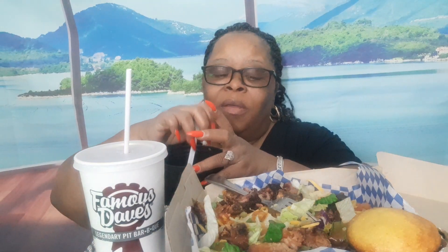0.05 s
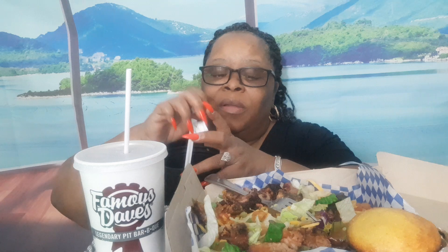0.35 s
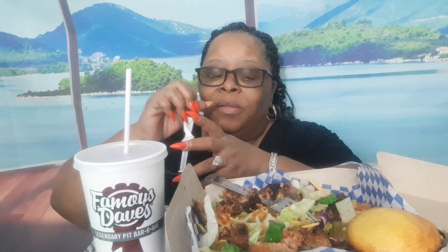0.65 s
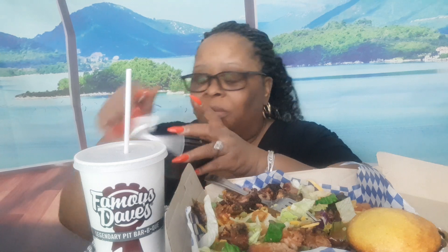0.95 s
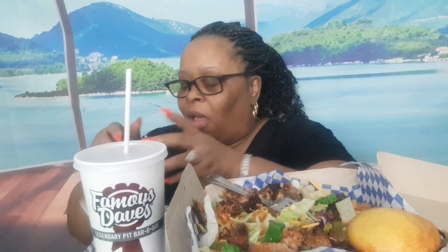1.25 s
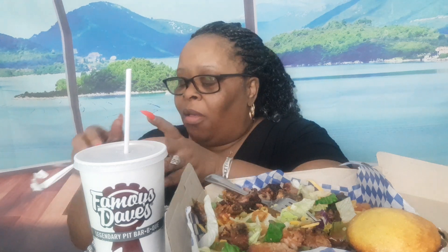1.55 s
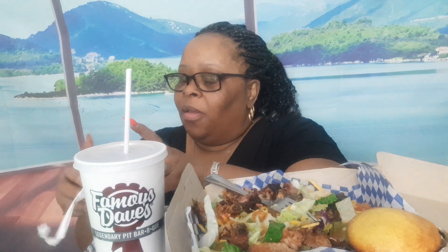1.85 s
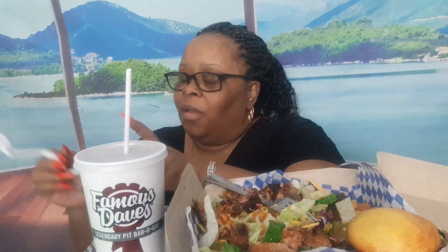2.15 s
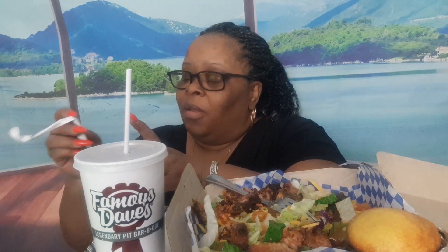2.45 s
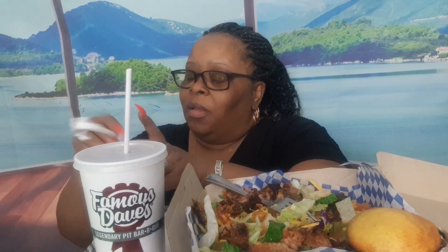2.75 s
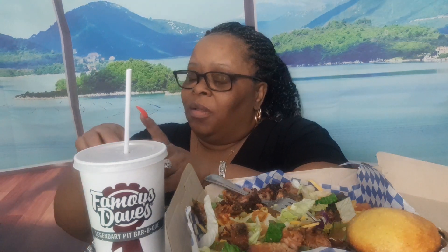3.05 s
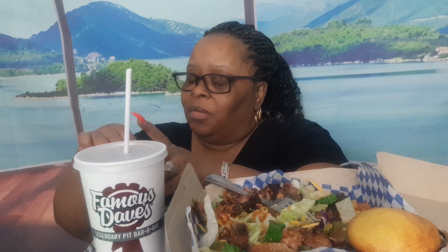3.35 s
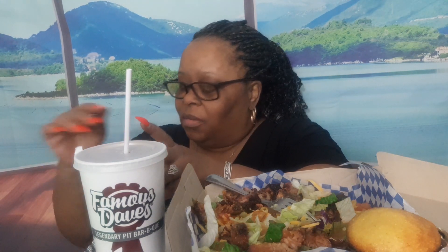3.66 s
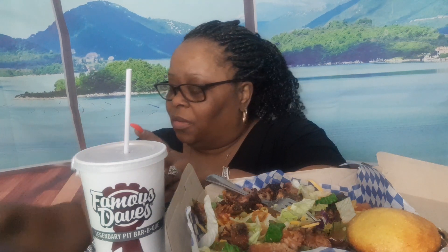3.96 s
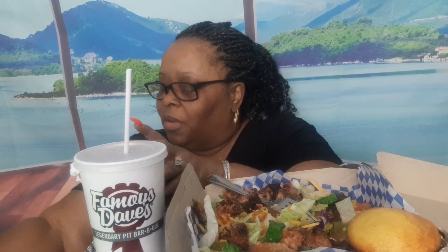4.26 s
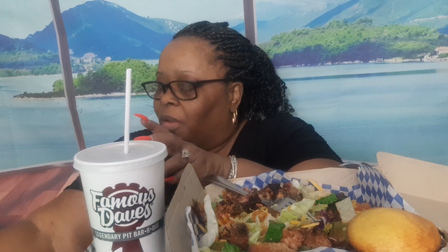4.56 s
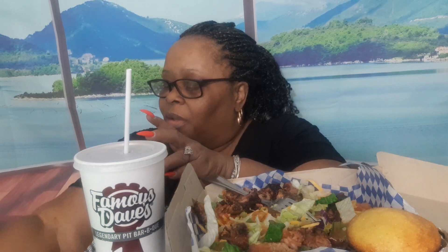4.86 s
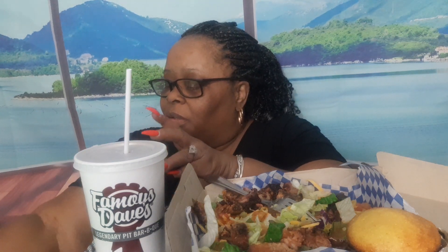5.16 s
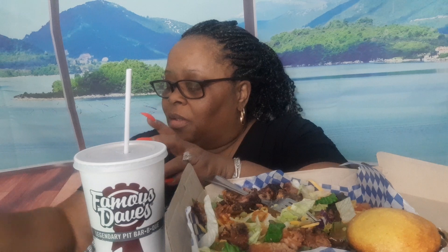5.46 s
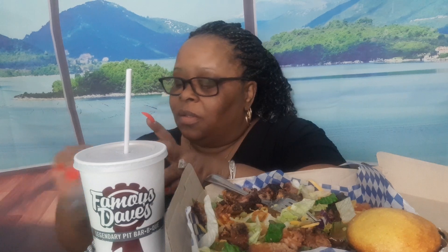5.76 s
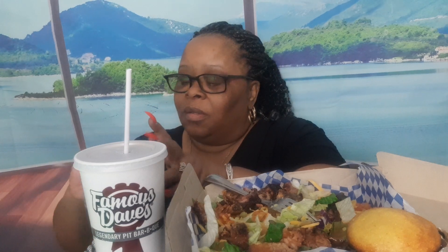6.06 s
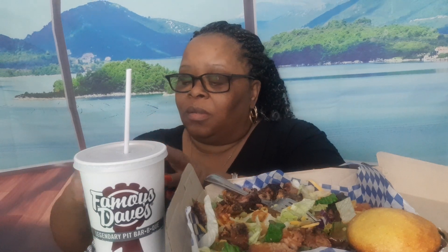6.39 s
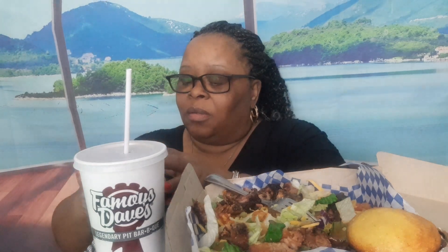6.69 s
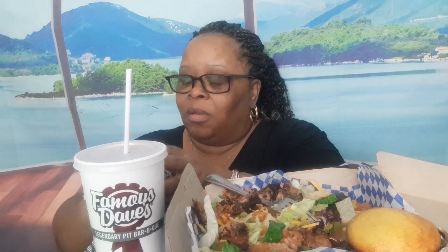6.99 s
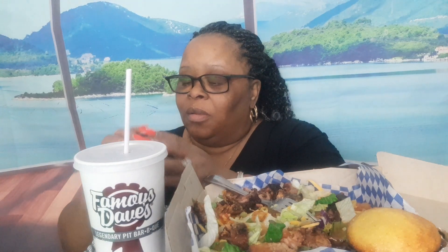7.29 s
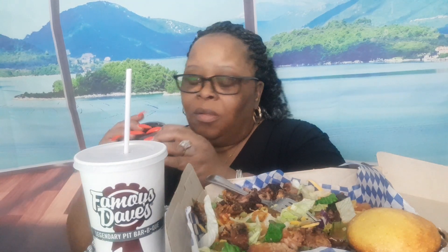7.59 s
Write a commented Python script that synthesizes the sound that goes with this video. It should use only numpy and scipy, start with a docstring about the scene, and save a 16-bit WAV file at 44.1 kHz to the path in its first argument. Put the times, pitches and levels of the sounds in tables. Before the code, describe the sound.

Someone handles takeout things at a table close to the microphone. Light crackles and crisp snaps from a paper wrapper come first, followed by a short run of plastic fork clicks and a tap on a lidded cup. A paper-lined food box scrapes and rocks across the table, lands with a hollow knock and gets one last push. An appliance hums quietly throughout, and the small room adds a short echo.

```python
"""Someone fiddles with takeout things at a table in a small, echoing room; an appliance hums throughout.
First a paper wrapper crinkles and snaps, a forearm rubs the table and a lidded tub is tapped twice.
From 4.3 s a box scrapes along, its paper liner crackling, and a plastic fork ticks on a thin tray.
Near 6 s the tub is tapped again and the box is dragged, rocking on its base. Just before 7 s the box
is set down with a hollow clatter, and one last push ends the scene."""
import sys
import numpy as np
from scipy import signal
from scipy.fft import rfft, irfft
from scipy.io import wavfile
from scipy.ndimage import uniform_filter1d

SR = 44100
rng = np.random.default_rng(int(sys.argv[2]) if len(sys.argv) > 2 else 0)


def output_pcm(signal):
    """Save a mono or channel-first signal as 16-bit PCM at the path in sys.argv[1].

    Samples are clipped to [-1, 1] before scaling.
    """
    pcm = np.clip(np.atleast_2d(signal).T, -1, 1) * 32767
    wavfile.write(sys.argv[1], SR, np.round(pcm).astype(np.int16))


N = 340977
T = np.arange(N) / SR

# Levels compare the rows of a table; the functions set the final loudness.
# low fan noise and faint hiss: pitch_hz, level_db
AIR_SPECTRUM = [(15, -42), (25, -0.5), (45, -18.5), (66, -6.5), (80, -18.5), (114, 3), (145, -3.5),
                (190, -4.5), (309, -9.5), (430, -12.5), (607, -23), (1300, -36), (5000, -38.5),
                (7700, -37.5), (16000, -47)]
# the appliance's tones: pitch_hz, level_db, waver_db
HUM_TONES = [(57, -69, .7), (109, -68.5, 2.5), (141, -72, 2.5), (200.5, -71, 2.5), (276, -76, 2.5),
             (410.2, -65.5, .9)]
# fingers crumpling the wrapper: start_s, length_s, level_db, brightness_db_per_octave
WRAPPER_GRIPS = [(0.0, 0.0032, -52, 3), (.18, 0.15, -59.5, 5), (.3, 0.6, -74, 3.5), (.88, 0.31, -61.5, 1),
                 (1.13, 0.1, -69.5, 2.5), (1.22, 0.17, -54, -0.5), (1.33, 0.22, -65, -6),
                 (1.58, 0.47, -59, 0.5), (1.935, 0.064, -48.5, 0), (2.04, 0.17, -61.5, -1),
                 (2.2, 0.43, -58, 8), (2.72, .13, -47.5, 7.5), (2.9, 0.14, -53, 5),
                 (3.12, 0.081, -50.5, 7.5), (3.24, 0.25, -64, 4.5), (4.31, 0.12, -66, 3.5),
                 (4.56, 0.21, -58, -8.5), (4.87, 0.079, -60, -0.5), (7.565, 0.097, -60, 5.5)]
# the rustle of paper: pitch_hz, level_db
PAPER_SPECTRUM = [(700, -30.5), (1400, -13.5), (2200, -7.5), (3300, -4.5), (6800, -3), (9000, -11.5),
                  (12000, -9.5), (16000, -20)]
# a forearm rubbing the table: start_s, length_s, level_db, squeak_hz
ARM_RUBS = [(0.0, 0.64, -77.5, 890), (.94, 0.27, -71.5, 530), (1.945, 0.02, -49.5, 480),
            (2.09, 0.078, -66, 1150), (2.77, 0.47, -74.5, 758), (3.35, .11, -74.5, 1144)]
# the notes of the rubbed table top: pitch_hz, width_hz, level_db
TABLE_NOTES = [(480, 380, 3), (1140, 300, 4), (1940, 630, 0.5)]
# creases and nails snapping on the wrapper: start_s, level_db, contact_s, ring_hz, ring_db
WRAPPER_SNAPS = [(0.1014, -24.5, 0.0013, 4480, 3), (1.0187, -33, 0.0078, 4350, -5),
                 (1.0827, -34.5, 0.021, 4600, -2), (1.2772, -27.5, 0.0024, 6800, -4),
                 (1.328, -31, 0.0067, 6230, 3), (1.352, -29.5, 0.0021, 5800, -3),
                 (1.761, -36.5, .002, 6300, 4), (1.9987, -27, 0.0017, 6500, 7),
                 (2.1348, -35.5, 0.0024, 5960, 9), (2.1685, -36, 0.0011, 8000, 6),
                 (2.1906, -24.5, .0008, 7500, 19), (2.3198, -34.5, 0.0017, 6500, 4),
                 (2.408, -37, .001, 7050, 4), (2.4198, -30.5, 0.0016, 6200, 11),
                 (2.453, -26, 0.0017, 9400, -3), (2.6385, -32.5, 0.0023, 5960, -1),
                 (2.7118, -28, 0.0021, 9000, 8), (2.7655, -29, .001, 8100, -8),
                 (2.802, -28.5, 0.00086, 6900, -6), (2.8685, -31, 0.00079, 11200, -7),
                 (2.9597, -40, 0.00089, 7460, -9), (2.992, -27, 0.0039, 5400, 4),
                 (3.083, -33.5, 0.008, 6900, -4), (3.1423, -34, .004, 6000, 6),
                 (3.201, -42, 0.0036, 10600, -4), (3.4567, -31.5, .0012, 7000, -11),
                 (3.5147, -38, 0.0014, 6940, -3)]
# the snap of a crease: pitch_hz, level_db
SNAP_SPECTRUM = [(150, -41), (2100, -44), (3000, -6), (4800, -3.5), (7500, -5.5), (11000, -7), (16000, -11)]
# taps on a lidded tub: start_s, level_db, contact_s, body_db, wall_db
TUB_TAPS = [(1.4872, -41, 0.0046, -16.5, -8), (1.956, -47.5, 0.013, -4, 4),
            (5.7756, -25.5, 0.0021, -4.5, -4.5), (5.8666, -55, 0.0018, 5, 12.5),
            (6.0555, -45.5, 0.0019, -12, -3.5), (6.2095, -44.5, 0.0024, -4, -5),
            (6.2235, -44.5, 0.0021, -9, -1.5)]
# the notes of the tub's air space and lid: pitch_hz, width_hz, level_db
TUB_NOTES = [(433, 15, 12.5), (755, 83, -4), (1150, 78, 9), (1310, 190, 1.5), (1580, 570, -6.5)]
# the clack of the tub's rim: pitch_hz, level_db
RIM_SPECTRUM = [(800, -15), (2300, 1.5), (3200, -0.5), (3900, 5), (5200, -6.5), (6800, -2), (9000, -12.5),
                (16000, -19.5)]
# a box pushed over the table: start_s, length_s, level_db, squeak_hz, liner_db
BOX_PUSHES = [(4.332, 0.089, -63, 800, -74), (4.492, 0.063, -56, 490, -65.5), (4.69, 0.29, -64.5, 810, -73),
              (5.835, 0.26, -60, 1000, -62.5), (6.159, 0.068, -50, 940, -60.5),
              (6.251, 0.1, -60, 1040, -62.5), (6.376, 0.095, -65, 940, -65.5), (6.519, 0.2, -71, 940, -70),
              (6.731, 0.23, -61.5, 995, -62.5), (6.877, 0.12, -41.5, 800, -52.5),
              (7.038, 0.16, -62, 800, -67.5), (7.578, 0.41, -56, 430, -64.5)]
# the notes of the sliding box: pitch_hz, width_hz, level_db
SCRAPE_NOTES = [(460, 148, -3), (709, 155, 3.5), (836, 410, -1.5), (2120, 580, -6.5)]
# the fork ticking on plastic: start_s, level_db, contact_s, ring_hz, ring_db, treble_limit_hz
FORK_TICKS = [(4.495, -49, 0.0022, 5600, 10, 9000), (4.603, -33, 0.005, 4540, -22, 13000),
              (4.6153, -31, 0.0023, 6800, -5, 12000), (4.6367, -29.5, .003, 6800, -10, 12000),
              (4.6639, -16, 0.0028, 6900, -1.5, 15000), (4.7725, -27, 0.0025, 3800, -14, 15000),
              (4.8835, -38, 0.0033, 5900, -5, 10000), (4.96, -29, 0.0045, 5650, -13, 14000),
              (5.235, -41, .002, 6400, -7, 6000), (6.843, -29.5, 0.0072, 2830, -13, 6580)]
# the snap of the fork: pitch_hz, level_db
FORK_SPECTRUM = [(150, -18), (900, -20.5), (1900, -16.5), (3000, -9), (4100, -2), (5300, -4), (6800, -3.5),
                 (8800, -11), (16000, -11.5)]
# the notes of the thin tray under the fork: pitch_hz, width_hz, level_db
TRAY_NOTES = [(800, 23, 20), (1300, 23, 24), (3550, 24, 19.5), (3680, 29, 21), (4270, 27, 12),
              (7150, 60, 8)]
# the box meeting the table: start_s, level_db, contact_s, body_db, wall_db
BOX_KNOCKS = [(4.496, -51, 0.05, 3.5, -19), (4.776, -43, 0.0073, -11, -2), (6.661, -44, 0.0029, -10, -14),
              (6.940, -21.5, 0.0093, -3.5, -9), (6.9485, -22.5, 0.01, -4.5, -1),
              (6.958, -24.5, 0.0062, -13, -2.5), (7.122, -49, 0.0025, 1, -1),
              (7.2825, -55.5, 0.0058, -7.5, 0.5)]
# the notes of the box's hollow body: pitch_hz, width_hz, level_db
BOX_NOTES = [(127, 25, -8), (315, 90, -4.5), (490, 78, -4), (604, 38, 0), (720, 59, 3), (830, 45, 4.5),
             (935, 30, -1.5), (1135, 80, -3)]
# the clack of the box's stiff walls: pitch_hz, level_db
WALL_SPECTRUM = [(500, -25), (1300, -20), (1900, -5), (2500, -9.5), (3200, -2.5), (4000, -1.5),
                 (5400, -7.5), (7000, -7), (10000, -13), (16000, -23.5)]
# the box rocking on its base: start_s, level_db
BOX_ROCKS = [(6.048, -55.5), (6.123, -63), (6.196, -47.5), (6.305, -59), (6.432, -57), (6.565, -57),
             (6.655, -64), (7.28, -61), (7.38, -61.5), (7.463, -62), (7.667, -56.5)]
# the hollow notes of that base: pitch_hz, width_hz, level_db
BASE_NOTES = [(742, 180, 3.5), (1004, 280, -0.5)]
# how long the room's echo takes to fade by 60 dB: pitch_hz, fade_s
ROOM_FADE = [(200, 0.51), (600, 0.34), (1400, 0.42), (3700, 0.45), (7000, 0.31), (14000, 0.28)]


def gain(db):
    """Turn decibels into a number to multiply by."""
    return 10 ** (np.asarray(db) / 20)


def unit(x):
    """Scale a signal to an average strength (rms) of 1."""
    return x / np.sqrt(np.mean(x ** 2))


def value_at(points, hz):
    """Read between the rows of a (pitch, value) table, spacing the pitches by octaves."""
    pitches, values = np.transpose(points)
    return np.interp(np.log(hz + 1), np.log(pitches), values)


def colour(x, spectrum, size=4096):
    """Make each pitch of a sound as strong as the spectrum says."""
    cepstrum = irfft(np.log(gain(value_at(spectrum, np.fft.rfftfreq(size, 1 / SR)))))
    cepstrum[1:size // 2] *= 2  # fold it forward, so nothing sounds before its cause
    cepstrum[size // 2 + 1:] = 0
    return signal.fftconvolve(x, irfft(np.exp(rfft(cepstrum))))[:len(x)]


def ring(x, notes):
    """Let a sound set an object's own notes ringing; neighbouring notes swing opposite ways."""
    return sum((-1) ** k * gain(db) * signal.lfilter(*signal.iirpeak(hz, hz / width, SR), x)
               for k, (hz, width, db) in enumerate(notes))


def keep_side(x, hz, side):
    """Gently keep only the "low" or the "high" side of a pitch."""
    return signal.sosfilt(signal.butter(2, hz, side, fs=SR, output="sos"), x)


def drift(rate_hz):
    """A smooth random wobble, about 1 in size."""
    step = int(SR / rate_hz)
    stairs = np.repeat(rng.standard_normal(N // step + 1), step)
    return unit(uniform_filter1d(stairs, step)[:N])


def place(x, pan_db, delay_samples):
    """Split into left (delayed), right and a feed for the room; a pan below 0 favours the right."""
    delayed = np.pad(x, (delay_samples, 0))[:len(x)]
    return np.array([delayed * gain(pan_db / 2), x * gain(-pan_db / 2), x])


def add(out, start_s, x):
    """Mix in a short sound at its start time."""
    i = int(start_s * SR)
    out[:, i:i + x.shape[1]] += x[:, :N - i]


def surround(mid, side, apart_hz):
    """Sound from all around: left and right are alike in the bass and unrelated in the treble."""
    hz = np.fft.rfftfreq(len(mid), 1 / SR)
    side = irfft(rfft(side) * hz / np.hypot(hz, apart_hz), len(mid))
    return np.array([mid + side, mid - side])


def stroke(start_s, length_s, attack_s, release_s):
    """One hand movement swells, holds and dies away: gives its stretch of samples and its strength."""
    span = slice(int(start_s * SR), int((start_s + length_s + 8 * release_s) * SR))
    t = T[span] - start_s
    return span, np.clip(t / attack_s, 0, 1) * np.exp(-np.maximum(t - length_s, 0) / release_s)


def tiny_slips(per_second, spread_db):
    """Tiny slips at random times, mostly weak and a few strong, evened out to a steady level."""
    count, slips = int(per_second * N / SR), np.zeros(N)
    strengths = gain(spread_db * np.minimum(rng.exponential(size=count), 4))
    slips[rng.integers(0, N, count)] = strengths * rng.choice([-1, 1], count)
    local_power = np.abs(uniform_filter1d(slips ** 2, size=1800))
    return slips / np.sqrt(local_power + 1e-6)


def contact(contact_s, grit, size=6000):
    """Two things meet: a push, then a dying chatter that shakes all pitches about equally."""
    fade = np.exp(-np.arange(size) / SR / contact_s)
    push = grit * unit(rng.standard_normal(size) * fade)
    push[0] += np.sqrt(size)
    evened = irfft(np.exp(1j * np.angle(rfft(push))))
    return evened * fade ** .2


def appliance(air_db=-56.5):
    """Low fan noise and faint hiss lie under the appliance's wavering hum."""
    mid, side = (unit(colour(rng.standard_normal(N), AIR_SPECTRUM)) for _ in range(2))
    air = surround(keep_side(mid, 78, "high"), side, apart_hz=940)
    out = air * gain(air_db + 0.5 * drift(3.6))
    for hz, db, waver_db in HUM_TONES:
        waver = gain(waver_db * drift(6.1))
        tone = np.sin(2 * np.pi * hz * T + 0.18 * waver_db * drift(3.8))
        out += gain(db) * unit(waver * tone)
    return out


def paper_crinkles(sharpness=2.5, patchy_db=2.5):
    """Paper is many small flat patches that take turns; each slip rings one at its own pitch."""
    out = np.zeros(N)
    for hz in np.geomspace(900, 14000, 9):
        slips = tiny_slips(per_second=450, spread_db=5) * gain(patchy_db * drift(35))
        out += ring(slips, [(hz, hz / sharpness, 0)])
    return out


def paper_rustle(grips, crinkles, level_db, pan_db, flutter_db, pivot_hz=6000):
    """Each grip sets off a shower of crinkles; tight crumpling is brighter than loose brushing."""
    out = np.zeros((3, N))
    showers = crinkles * gain(flutter_db * drift(45))
    for start_s, length_s, db, brightness in grips:
        span, grip = stroke(start_s, length_s, attack_s=0.21 * length_s, release_s=0.021)
        spectrum = [(hz, band_db + brightness * np.log2(hz / pivot_hz)) for hz, band_db in PAPER_SPECTRUM]
        creases = unit(keep_side(colour(showers[span], spectrum), 380, "high"))
        add(out, start_s, place(creases * grip * gain(db + level_db), pan_db, delay_samples=1))
    return out


def table_scrape(moves, notes, level_db, judder_db, squeak_width_hz=140, squeak_db=1.5):
    """An arm or a box sticks and slips over the table, ringing a few notes and squeaking dully."""
    out = np.zeros(N)
    slips = tiny_slips(per_second=900, spread_db=3)
    scrape = unit(ring(ring(slips, notes), notes))
    for start_s, length_s, db, squeak_hz, *_ in moves:
        span, movement = stroke(start_s, length_s, attack_s=0.038, release_s=0.012)
        squeak_note = [(squeak_hz, squeak_width_hz, 0)]
        squeak = unit(ring(ring(slips[span], squeak_note), squeak_note))
        out[span] += unit(scrape[span] + gain(squeak_db) * squeak) * gain(db) * movement
    return place(out * gain(level_db + judder_db * drift(28)), pan_db=0, delay_samples=0)


def click(spectrum, contact_s, ring_hz, ring_db, sharpness):
    """A snap, plus the brief ring of the spot that was struck."""
    snap = unit(colour(contact(contact_s, grit=5), spectrum))
    spot = unit(ring(snap, [(ring_hz, ring_hz / sharpness, 0)]))
    return unit(snap + gain(ring_db) * spot)


def wrapper_snaps(level_db=-27.5, move_aside_s=1.2):
    """Single creases give way; a smaller spot both rings and snaps higher."""
    out = np.zeros((3, N))
    usual_hz = np.median([ring_hz for _, _, _, ring_hz, _ in WRAPPER_SNAPS])
    for start_s, db, contact_s, ring_hz, ring_db in WRAPPER_SNAPS:
        spectrum = [(hz * (ring_hz / usual_hz) ** 0.64, band_db) for hz, band_db in SNAP_SPECTRUM]
        snap = click(spectrum, contact_s, ring_hz, ring_db, sharpness=6.2) * gain(db + level_db)
        # the hands start straight ahead, then move to the right
        pan_db, delay_samples = (-5.5, 5) if start_s > move_aside_s else (0, 0)
        add(out, start_s, place(snap, pan_db, delay_samples))
    return out


def container_knocks(hits, body_notes, wall_spectrum, level_db, pan_db):
    """A tub or a box is struck: its hollow body booms while its walls rattle."""
    out = np.zeros((3, N))
    for start_s, db, contact_s, body_db, wall_db in hits:
        push = contact(contact_s, grit=4)
        boom = gain(body_db) * unit(ring(push, body_notes))
        rattle = gain(wall_db) * unit(colour(push, wall_spectrum))
        add(out, start_s, place((boom + rattle) * gain(db + level_db), pan_db, delay_samples=2))
    return out


def pushed_box(crinkles, brightness_db_per_octave=-2.5):
    """The box scrapes over the table while its paper liner crackles."""
    scrape = table_scrape(BOX_PUSHES, SCRAPE_NOTES, level_db=-2.5, judder_db=3)
    liner = [(start_s, length_s, liner_db, brightness_db_per_octave)
             for start_s, length_s, _, _, liner_db in BOX_PUSHES]
    return scrape + paper_rustle(liner, crinkles, level_db=2, pan_db=-5, flutter_db=2.5)


def fork_ticks(level_db=-22, tray_db=-13):
    """The fork ticks, hard or dull, and the tray under it rings on briefly."""
    ticks = np.zeros((3, N))
    for start_s, db, contact_s, ring_hz, ring_db, treble_limit_hz in FORK_TICKS:
        tick = click(FORK_SPECTRUM, contact_s, ring_hz, ring_db, sharpness=3.5)
        tick = unit(keep_side(tick, treble_limit_hz, "low"))
        add(ticks, start_s, place(tick * gain(db + level_db), pan_db=-7, delay_samples=12))
    return ticks + gain(tray_db) * ticks.std() * unit(ring(ticks, TRAY_NOTES))


def rocking_box(level_db=-8):
    """The box tips from edge to edge, landing each time with a soft, hollow bump."""
    out = np.zeros((3, N))
    for start_s, db in BOX_ROCKS:
        landing = contact(contact_s=0.016, grit=4)
        bump = unit(ring(ring(landing, BASE_NOTES), BASE_NOTES))
        add(out, start_s, place(bump * gain(db + level_db), pan_db=1, delay_samples=2))
    return out


def room(placed, echo_db, size=32768):
    """Sound bounces off the table top at once; the bare walls add a dense, fading echo."""
    t, hz = np.arange(size) / SR, np.fft.rfftfreq(size, 1 / SR)
    bands = np.round(2 * np.log2(hz + 1))  # half an octave each
    noise = rfft(rng.standard_normal((2, size)))
    walls = np.zeros((2, size))
    for band in np.unique(bands[hz > 60]):
        fade_s = value_at(ROOM_FADE, 2 ** (band / 2))
        walls += irfft(noise * (bands == band)) * gain(-60 * t / fade_s)
    walls = surround(*walls, apart_hz=1100) * (1 - np.exp(-t / .002))
    table = surround(*rng.standard_normal((2, size)), apart_hz=1400) * t * np.exp(-t / .002)
    echo = (gain(echo_db) * unit(walls) + gain(-7.5) * unit(table)) / np.sqrt(size)
    left, right, feed = placed
    return np.array([left, right]) + signal.fftconvolve(feed[None], echo, axes=1)[:, :N]


def scene():
    """Mix it all in the room; the tub, rustles and scrapes get the most echo."""
    snaps = room(wrapper_snaps(), echo_db=-3)
    fork = room(fork_ticks(), echo_db=-2.5)
    knocks = container_knocks(BOX_KNOCKS, BOX_NOTES, WALL_SPECTRUM, level_db=-12.5, pan_db=-5)
    box = room(knocks + rocking_box(), echo_db=-2)
    taps = container_knocks(TUB_TAPS, TUB_NOTES, RIM_SPECTRUM, level_db=-18, pan_db=-4.5)
    tub = room(taps, echo_db=4)
    crinkles = paper_crinkles()
    wrapper = paper_rustle(WRAPPER_GRIPS, crinkles, level_db=-2, pan_db=-3, flutter_db=2)
    forearm = table_scrape(ARM_RUBS, TABLE_NOTES, level_db=3, judder_db=3.5)
    handling = room(wrapper + forearm + pushed_box(crinkles), echo_db=3)
    return appliance() + handling + snaps + tub + fork + box


def record(dry):
    """Cut away the very highest treble, above 16200 Hz."""
    return signal.sosfilt(signal.ellip(8, .2, 70, 16200, fs=SR, output="sos"), dry)


dry = scene()
out = record(dry)
output_pcm(out)
```